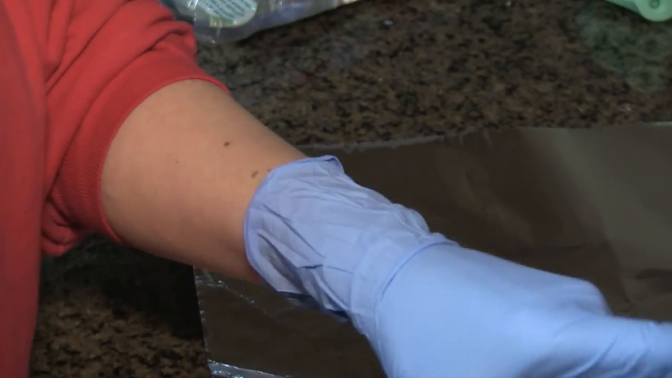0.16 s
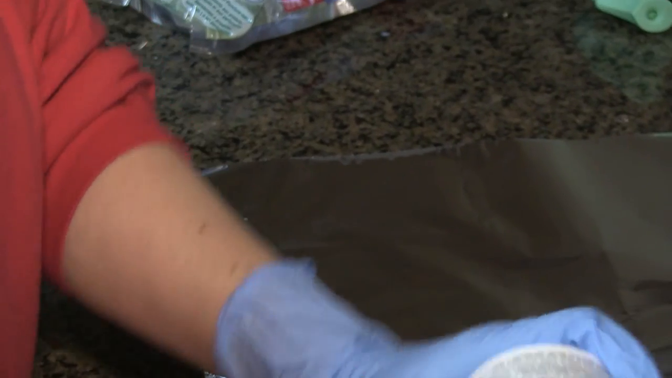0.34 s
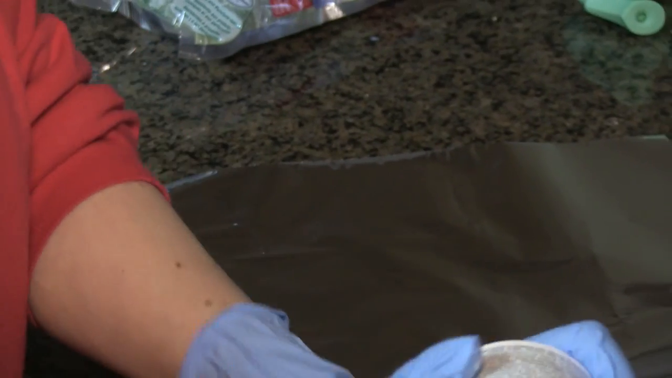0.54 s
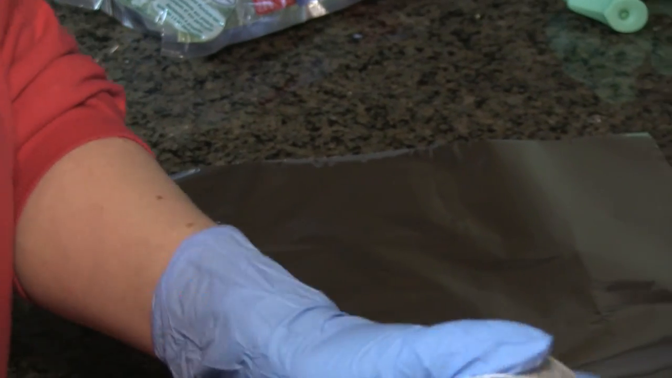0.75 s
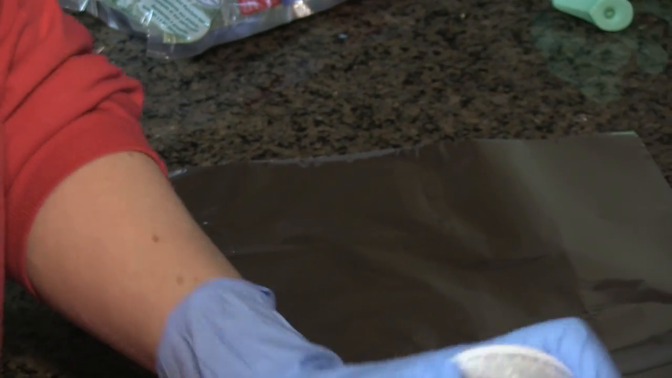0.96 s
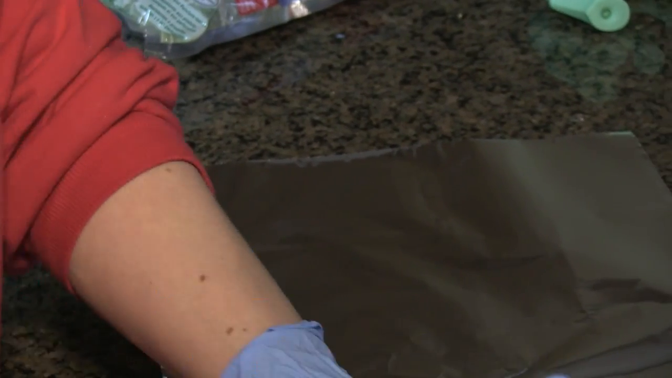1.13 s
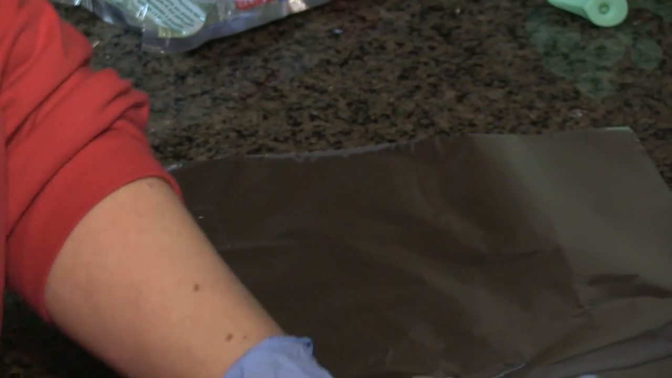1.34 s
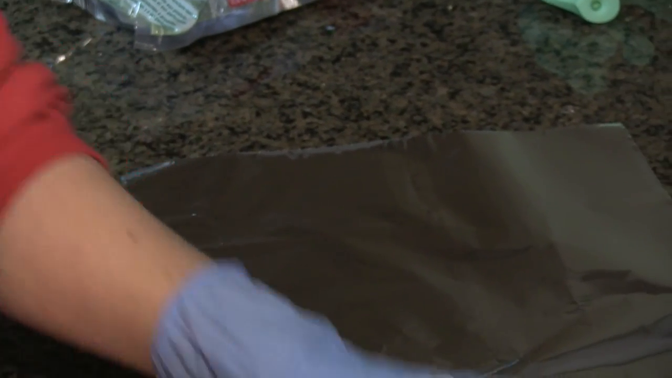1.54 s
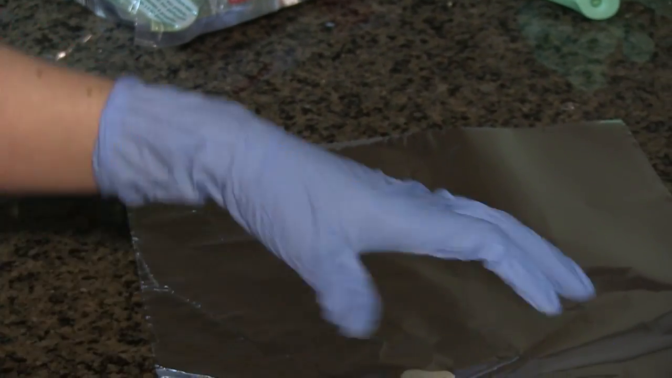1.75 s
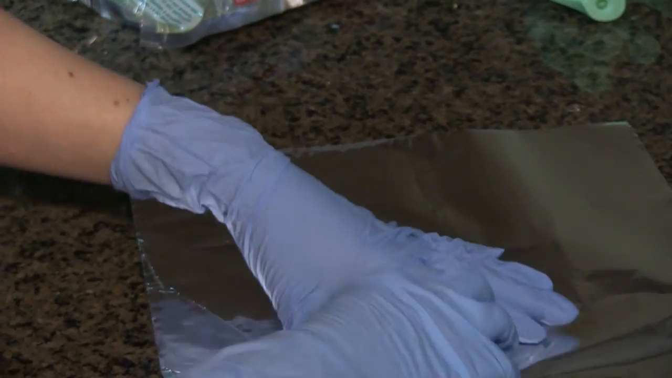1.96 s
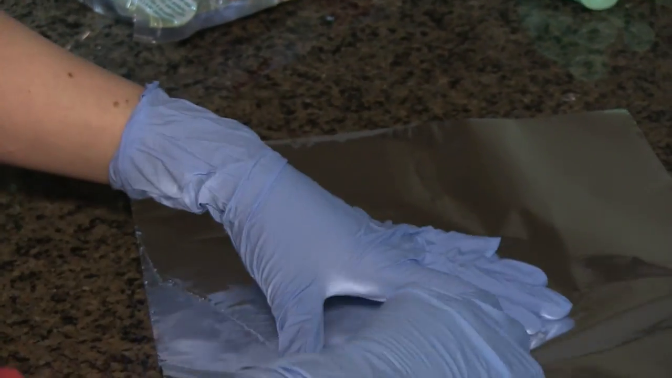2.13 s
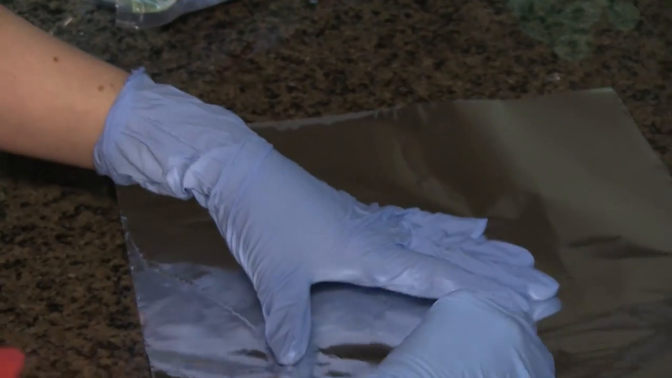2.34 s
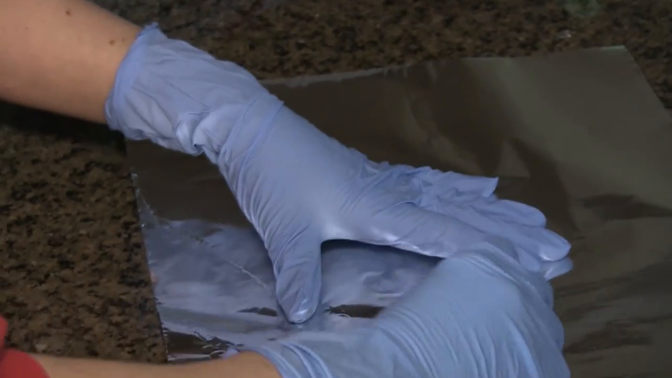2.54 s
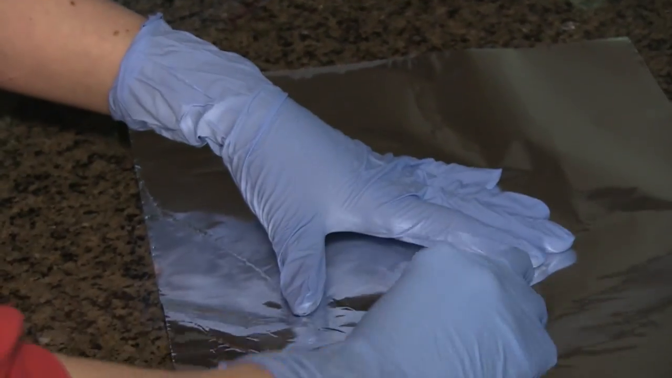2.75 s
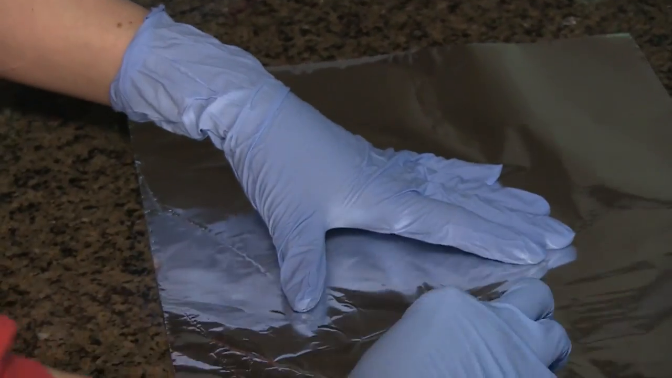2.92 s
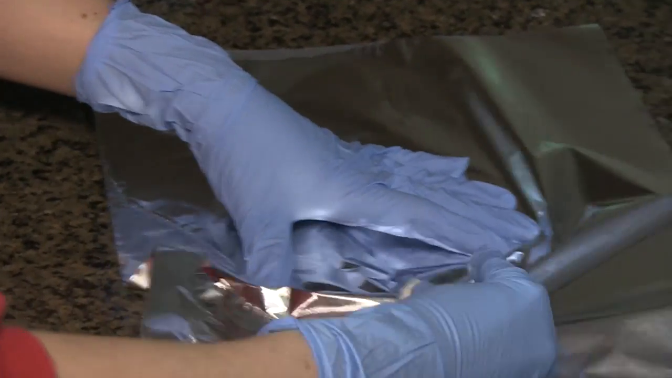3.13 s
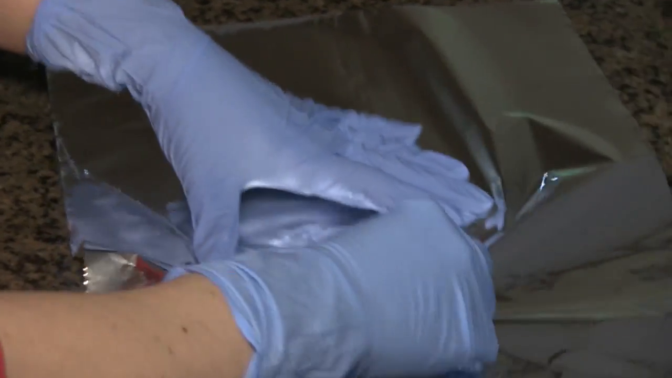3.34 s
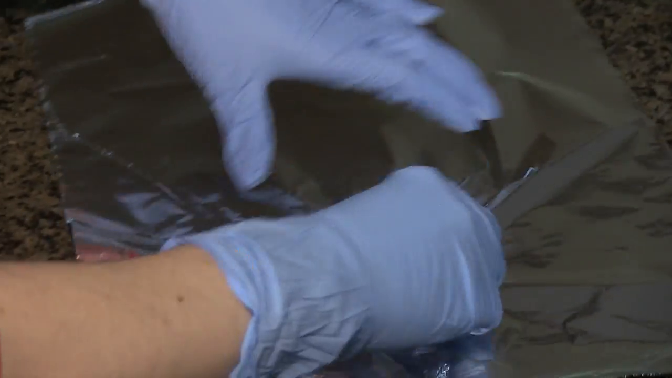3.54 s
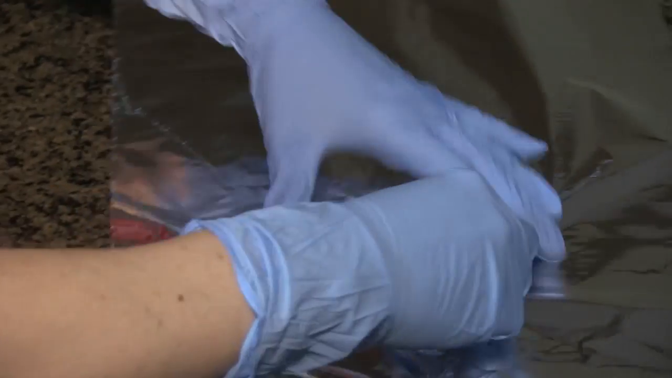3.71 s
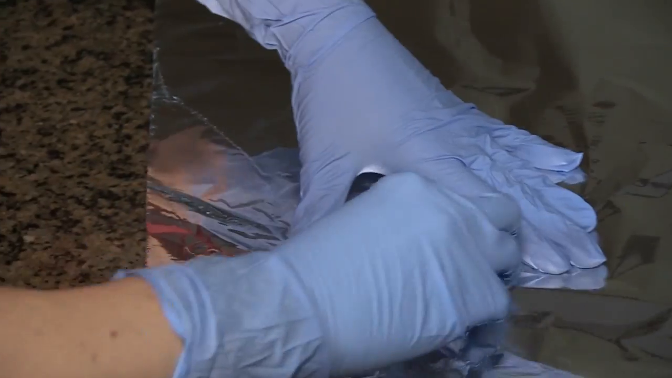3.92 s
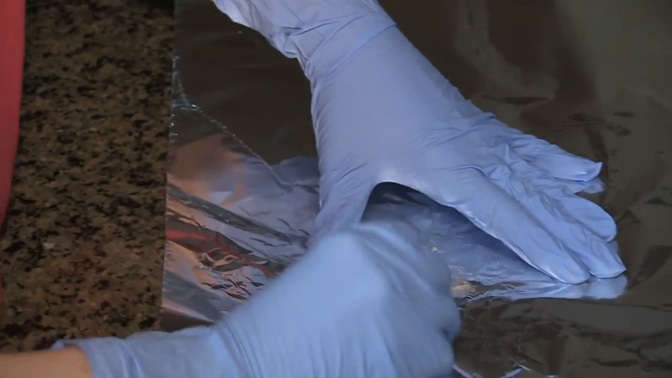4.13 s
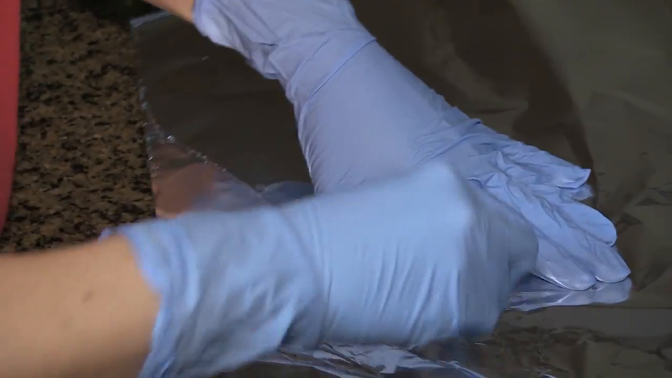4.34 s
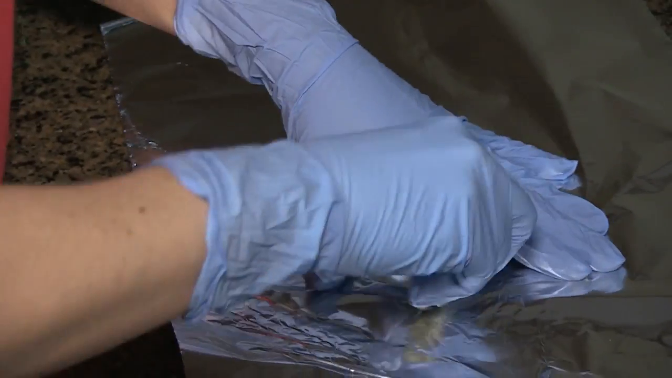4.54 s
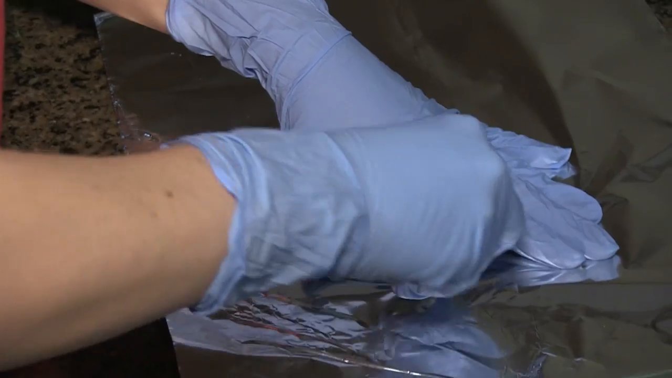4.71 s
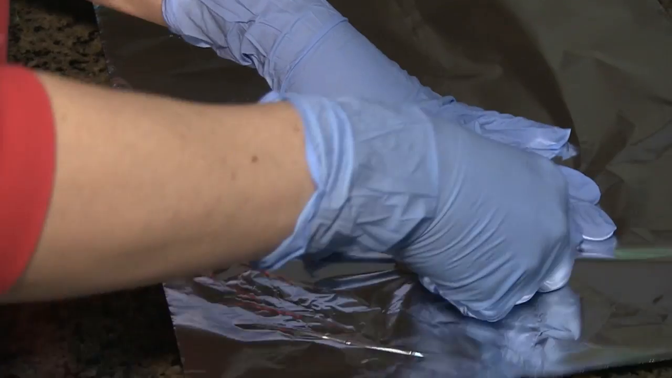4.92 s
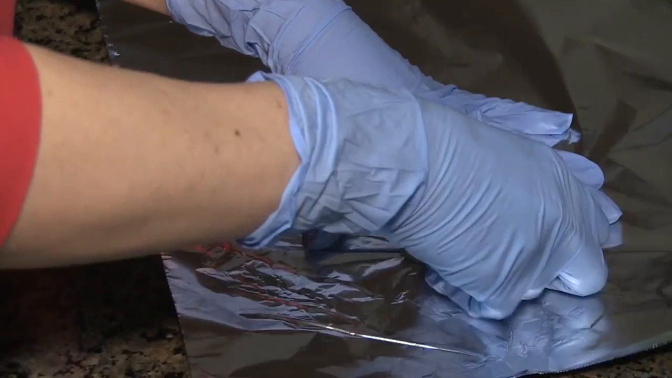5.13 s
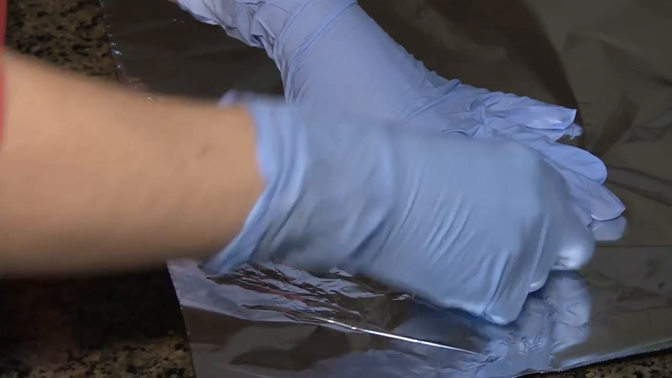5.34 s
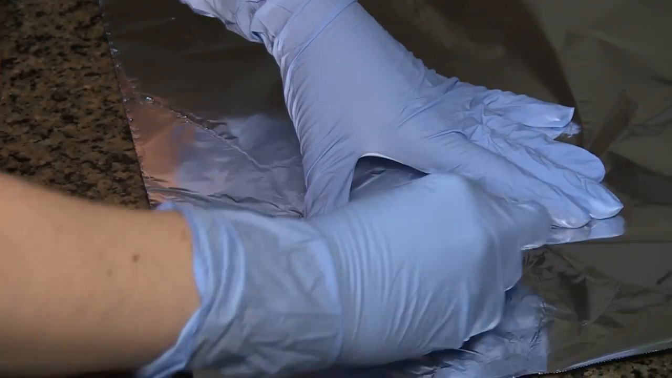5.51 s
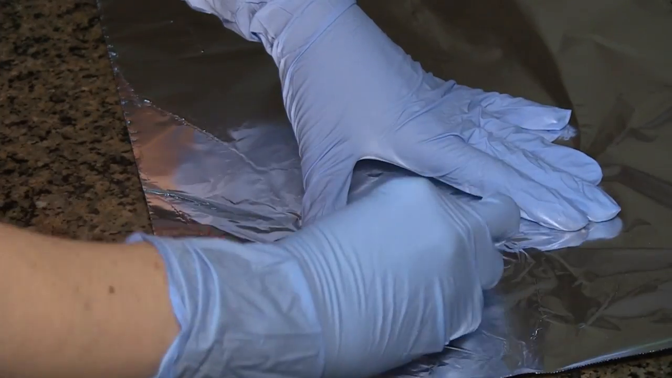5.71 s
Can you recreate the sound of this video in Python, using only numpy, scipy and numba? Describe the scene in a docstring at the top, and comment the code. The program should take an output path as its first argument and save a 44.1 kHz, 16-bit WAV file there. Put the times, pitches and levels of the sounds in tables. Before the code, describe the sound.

A close microphone first catches soft cup scuffs and a few light ticks over faint low kitchen hum. A boomy knock rattles on the counter, then bright, jerky glove strokes begin. A hard tap distorts briefly; afterwards the thin sheet keeps crinkling and snapping under bursts of rubbing, with short hard-walled echoes, thinning out at the end.

```python
"""Gloved hands swish close to the microphone over a thin sheet, in a kitchen: friction noise gated by a random grip.
The sheet buckles in thousands of tiny decaying sine grains, and single creases snap in clusters of three.
Taps ring the damped modes of a small cup; a hollow thing bounces on the counter and the cabinet booms.
Band-by-band noise tails give the echoes of hard walls, and steady low-heavy noise is the kitchen hum behind.
The hardest tap overloads the recorder."""
import sys
import numpy as np
from scipy import signal
from scipy.fft import rfft, irfft, next_fast_len
from scipy.io import wavfile
from scipy.ndimage import uniform_filter1d
from numba import njit

SR = 44100
rng = np.random.default_rng(int(sys.argv[2]) if len(sys.argv) > 2 else 0)


def put_to_file(sound):
    """Save the sound as 16-bit audio at rate SR, in the file named by the first command-line argument."""
    columns = np.atleast_2d(sound).T  # one column per channel
    safe = np.clip(columns, -1, 1)
    whole_steps = np.round(safe * 32767)
    wavfile.write(sys.argv[1], SR, whole_steps.astype(np.int16))


N = 258867  # length in samples

# Strokes of the glove over skin, cup and sheet.
# Each row: start in seconds, hiss level in dB rms, swell in seconds, hold in seconds.
STROKES = [(.34, -57.5, 0.067, 0.018), (.96, -65.5, 0.066, 0.065), (1.29, -60, 0.046, 0.012),
           (1.47, -63, 0.037, .03), (2.068, -55.5, 0.0089, 0.019), (2.13, -47.5, 0.0089, 0.012),
           (2.208, -41, 0.0066, 0.025), (2.272, -34, 0.0072, 0.026), (2.345, -35, 0.0041, 0.012),
           (2.477, -58, .004, 0.012), (2.503, -39, 0.0045, 0.014), (2.57, -38, 0.044, 0.027),
           (2.735, -39.5, 0.018, 0.0097), (2.875, -46.5, 0.014, 0.0086), (2.94, -44.5, 0.0067, 0.0089),
           (3.082, -35, 0.011, .06), (3.2, -41, 0.026, 0.14), (3.468, -31.5, 0.013, 0.021),
           (3.632, -40.5, .012, 0.03), (3.73, -45.5, 0.013, 0.021), (3.805, -30.5, 0.02, 0.009),
           (3.89, -42.5, 0.014, 0.028), (4.003, -41.5, 0.023, 0.024), (4.075, -36, .02, 0.031),
           (4.52, -42, 0.013, 0.0037), (4.652, -43.5, .005, 0.016), (4.672, -43, 0.0064, 0.022),
           (4.838, -42.5, .006, 0.073), (4.938, -37, .005, 0.027), (5.005, -38.5, 0.0082, 0.047),
           (5.11, -38, 0.0066, 0.011), (5.18, -39, 0.017, 0.03), (5.28, -38, 0.0058, 0.023),
           (5.372, -46, .008, .02), (5.425, -40.5, 0.01, 0.02), (5.55, -38, 0.0059, 0.0058),
           (5.59, -41.5, 0.016, 0.01), (5.63, -41, 0.0099, 0.018)]
STROKE_T60_S, STROKE_FLEX_DB = 0.19, -15  # fade after the hold; flexing of the sheet relative to the hiss
# The palm drags on between strokes. Each row: time in seconds, hiss in dB rms, sheet flexing in dB rms.
DRAG = [(2.05, -90, -63), (2.3, -51, -49), (2.7, -59.5, -70), (2.8, -53, -62), (3.05, -61.5, -68),
        (3.14, -43.5, -40.5), (3.27, -38.5, -40), (3.45, -46, -45.5), (3.6, -45, -54.5), (3.8, -49, -59.5),
        (4.15, -47.5, -49), (4.3, -51.5, -58), (4.48, -49, -73), (4.62, -75, -64.5), (4.82, -65, -70),
        (4.95, -41, -51.5), (5.1, -43, -38.5), (5.28, -45, -48), (5.38, -51, -61), (5.56, -50, -48.5),
        (5.75, -68, -60), (5.87, -70, -66)]
# Colour of the glove's hiss. Each row: frequency in Hz, relative density in dB per Hz.
HISS = [(600, -20.5), (1500, -24.5), (3000, -14.5), (4500, -4), (6600, -0.5), (9000, -3), (12000, -7),
        (16000, -18)]
TREBLE_HZ, FLICKER_DB = 8000, 2  # the hiss above this flickers on its own; dB per unit of walk()
# Colour of the flexing sheet. Each row: frequency in Hz, relative density in dB per Hz.
FLEX = [(100, -38), (250, -19.5), (500, -6), (1000, -1.5), (1600, -1.5), (2500, -3), (4000, -2),
        (8000, -19)]
# Fingers scuff the cup. Each row: start in seconds, level in dB rms, swell in seconds, hold in seconds.
SCUFFS = [(0, -53.5, 0.0033, 0.026), (.13, -60.5, 0.0092, 0.19), (.33, -52, 0.0049, 0.0046),
          (.39, -55, 0.021, .015), (.49, -50, 0.011, 0.11), (.668, -52, 0.0033, 0.017),
          (.955, -54.5, 0.012, 0.12), (1.33, -60.5, 0.008, 0.008)]
SCUFF_T60_S = 0.31
# Colour of the scuffs. Each row: frequency in Hz, relative density in dB per Hz.
SCUFF = [(200, -9.5), (500, -5.5), (800, -1.5), (1000, -1), (1300, -10), (2500, -13), (5000, -30.5)]
# Single creases snapping. Each row: start in seconds, level of each grain in dB, central pitch in Hz.
CREASES = [(.5506, -43.5, 3280), (1.3428, -37.5, 7500), (1.8203, -30.5, 6330), (1.953, -44.5, 3420),
           (1.967, -43, 8400), (2.1421, -24.5, 6860), (2.1814, -35, 7330), (3.007, -34, 7000),
           (3.1242, -15, 8450), (3.4285, -25.5, 3620), (3.517, -35, 6650), (3.6764, -34, 6730),
           (3.9155, -29, 6400), (4.081, -30, 5640), (4.096, -17, 7620), (4.5244, -47, 7150),
           (4.7228, -21, 9200), (4.8337, -24.5, 7600), (4.869, -31, 6140), (4.9754, -39, 6100),
           (5.009, -25, 2750), (5.016, -15.5, 8900), (5.035, -24, 4960), (5.1126, -26, 8540),
           (5.136, -27, 6230), (5.1864, -26, 3020), (5.536, -30, 4900), (5.5593, -22.5, 4380),
           (5.7555, -39, 7000), (5.82, -36, 9900)]
# Taps on cup and counter. Each row: start in seconds, peak of the ring in dB, centre of the blow in Hz,
# softness in dB per octave, share of the free ring time (limited to 0.1 to 2 in use).
TAPS = [(.082, -40, 1220, -5, 0.96), (0.0885, -14, 1340, 7, 0.91), (.128, -38, 960, 25, 0.69),
        (.335, -39.5, 930, 17, 0.65), (.499, -31.5, 740, 31, 0.43), (.552, -41, 910, 6, 0.34),
        (.597, -33.5, 840, 29, 0.61), (.672, -30, 675, 5.5, 0.64), (0.969, -47, 600, 20, 0.6),
        (1.027, -43, 830, 8, 1.3), (1.538, -54.5, 208, 41, 0.82), (1.934, -37.5, 990, 29, 0.79),
        (1.955, -38, 300, 4.5, .94), (2.071, -44, 1060, 41, 3.1), (2.185, -32.5, 970, 3, 0.76),
        (2.213, -21.5, 960, 7, 0.81), (2.459, -19.5, 1350, 1.5, .87), (2.561, -23, 1350, 0, 1.1),
        (2.7636, 3, 1015, 8.5, 0.41), (2.954, -47.5, 260, 13, .71), (2.987, -36.5, 260, 3, 0.84),
        (3.204, -35.5, 500, 17, 0.67), (3.301, -36, 650, 39, 0.37), (3.421, -26, 1730, 6.5, 0.78),
        (4.096, -43.5, 343, 22, 0.78), (4.523, -34, 2000, 7, .2), (4.733, -39, 340, 17, 1.25),
        (4.775, -46, 340, 29, 2), (4.735, -46.5, 110, 9, 1.2), (5.099, -30, 960, 11, 0.61),
        (5.469, -44, 604, 39, 0.43), (5.558, -26, 1770, 33, 0.41)]
# Modes of the cup. Each row: frequency in Hz, relative level in dB, free ring time (t60) in seconds.
CUP = [(109.7, -11.5, 0.42), (213, -24, 0.13), (267.2, -3, 0.2), (340.6, 0.5, 0.094), (495, -6.5, 0.088),
       (672, -9.5, 0.085), (765, -10, 0.093), (887, -7, 0.082), (978, 4, 0.047), (1108, -8.5, 0.15),
       (1227, -2.5, 0.087), (1370, 13, 0.016), (1640, 2.5, 0.026), (1993, 5.5, 0.021), (2262, 4.5, 0.044),
       (2725, -7.5, 0.051), (3280, -8, 0.078), (4520, -5, 0.036)]
CRACK_DB, CRACK_GROWTH = -9.5, 1.205  # first contact of a full-scale tap; dB of crack per dB of ring
CRACK_HZ, CRACK_DULLING = 9000, .35  # top of a full-scale crack; weaker taps are duller, dB of pitch per dB
# A hollow thing lands on the counter and bounces. Each row: start in seconds, peak of the boom in dB.
THUDS = [(1.7295, -11.5), (1.7345, -14.5), (1.7424, -19.5), (1.7475, -20), (1.775, -37)]
# Modes of the cabinet. Each row: frequency in Hz, relative level in dB, free ring time (t60) in seconds.
CABINET = [(155.7, -13, 0.42), (223.5, -10.5, 0.34), (296, -6, 0.21), (384, -16.5, 0.44), (447, -2, 0.29),
           (528, -2, 0.24), (584.5, 0.5, 0.25), (663, -1.5, 0.4), (738, -13, 0.21), (880, -0.5, 0.18),
           (894, 3, 0.16), (1001, -11.5, 0.42), (1184, -9, 0.34)]
# Colour of the cabinet's clatter. Each row: frequency in Hz, relative density in dB per Hz.
CLATTER = [(40, -20), (110, -17), (250, -9.5), (600, -5.5), (1050, -7.5), (1400, -19.5), (1800, -16),
           (2200, -25.5), (3500, -36.5), (9000, -57.5)]
# Echoes of the room. Each row: band centre in Hz, decay time (t60) in seconds.
ROOM_T60 = [(200, 0.4), (800, 0.36), (3000, 0.15), (10000, 0.65)]
ROOM_DB = -17  # gain of the echoes
# Colour of the kitchen hum. Each row: frequency in Hz, relative density in dB per Hz.
KITCHEN = [(26, -47), (45, -10), (53, -2.5), (123, -0.5), (284, 0.5), (391, -3), (1210, -7.5), (1510, -11),
           (8450, -22), (14500, -35), (16000, -40)]
KITCHEN_DB = -60.5  # mean level, rms
TOP_HZ = 16000  # the converter passes nothing much above this


def rustle():
    """Gloves at work: hiss and sheet flexing share one catching grip; fingers scuff the cup."""
    slide, bend = curve(DRAG)
    strokes = gestures(STROKES, STROKE_T60_S)
    grip = stutter(count=450, t60=0.13, depth=1.07) * stutter(count=500, t60=0.022, depth=2.24)
    hiss_gain = np.sqrt(strokes + slide ** 2)
    flex_gain = np.sqrt(strokes * undb(STROKE_FLEX_DB) ** 2 + bend ** 2)
    scuff_gain = np.sqrt(gestures(SCUFFS, SCUFF_T60_S))
    return glove_hiss(grip) * hiss_gain + sheet_flex(grip) * flex_gain + cup_scuff() * scuff_gain


def glove_hiss(grip):
    """Smooth friction noise plus fine buckles, its treble flickering; rms 1."""
    hiss = coloured(HISS) + undb(-6.5) * crinkle(HISS, count=30000, cycles=5.8, scatter_db=2.5)
    treble = highpass(hiss, TREBLE_HZ)
    hiss = hiss + treble * (undb(FLICKER_DB * walk(40.)) - 1)
    return unit(hiss * grip)


def sheet_flex(grip):
    """The bending sheet: lower noise and buckles whose level wanders; rms 1."""
    flex = coloured(FLEX) + undb(-3.5) * crinkle(FLEX, count=16000, cycles=5.1, scatter_db=2.0)
    return unit(flex * grip * undb(1.5 * walk(45)))


def cup_scuff():
    """Fingers rubbing the cup: noise with an unsteady level; rms 1."""
    return unit(coloured(SCUFF) * undb(4.7 * walk(58.94)))


def creases():
    """A crease flips: a cluster of three short grains around its pitch."""
    start_s, level_db, hz = np.transpose(CREASES)
    late, detune = rng.random((len(start_s), 2, 3)).transpose(1, 0, 2)
    start = ((start_s[:, None] + 0.00086 * late) * SR).astype(np.int64).ravel()
    pitch = hz[:, None] * 2 ** (detune - .5)  # up to half an octave either way
    pitch = np.minimum(pitch, .4 * SR).ravel()
    return grains(N, start, pitch, np.full(len(start), 6.), np.repeat(undb(level_db), 3))


def taps():
    """Each blow mostly drives the modes near its centre; a soft blow pushes longer and picks out only those."""
    out = np.zeros(N)
    mode_hz = np.array(CUP)[:, :1]
    for start_s, peak_db, hz, soft_db, share in TAPS:
        near_db = -soft_db * np.abs(np.log2(mode_hz / hz))
        push_s = 0.027 * max(soft_db, 1) / hz
        add(out, start_s, undb(peak_db) * ring(CUP, near_db, np.clip(share, .1, 2), push_s))
        crack_hz = max(CRACK_HZ * undb(CRACK_DULLING * peak_db), 2500)
        crack_db = CRACK_DB + CRACK_GROWTH * peak_db
        add(out, start_s, undb(crack_db) * crack(0.024, crack_hz))
    return out


def thuds():
    """At each bounce the cabinet booms in a few clear modes and an uneven clatter of countless others."""
    out, age = np.zeros(N), np.arange(SR // 2) / SR
    for start_s, peak_db in THUDS:
        add(out, start_s, undb(peak_db) * ring(CABINET, 0, share=0.89, push_s=0.000285))
        clatter = (coloured(CLATTER) * undb(1.9 * walk(88)))[:len(age)]
        add(out, start_s, undb(peak_db - 12.5 - 60 * age / 0.38) * clatter)
        add(out, start_s, undb(peak_db - 15.5) * crack(0.0074, hz=4300))
    return out


def ring(modes, gains_db, share, push_s):
    """Damped sines that start together, build up over the push and die at their own rates; peak 1."""
    hz, db, t60 = np.transpose(modes)[:, :, None]
    age = np.arange(SR // 2) / SR
    decay = undb(db + gains_db - 60 * age / (t60 * share))
    x = (decay * np.sin(2 * np.pi * hz * age)).sum(0)
    x = x * (1 - np.exp(-age / push_s))
    x = highpass(x, 150)  # small bodies radiate little bass
    return x / np.abs(x).max()


def crack(t60, hz):
    """The noise of first contact, from 1500 Hz up to a dulling limit hz; peak 1."""
    age = np.arange(SR // 20) / SR
    band = signal.butter(2, [1500, min(hz, .45 * SR)], "band", fs=SR, output="sos")
    x = signal.sosfilt(band, rng.standard_normal(len(age))) * undb(-60 * age / t60)
    return x / np.abs(x).max()


def room(x):
    """Diffuse echoes of hard walls: noise bands that each decay at their own rate."""
    age = np.arange(SR // 2) / SR
    tail = 0
    for hz, t60 in ROOM_T60:
        band = signal.butter(1, [hz / 2, min(hz * 2, .45 * SR)], "band", fs=SR, output="sos")
        noise = unit(signal.sosfilt(band, rng.standard_normal(len(age))))
        tail = tail + noise * np.sqrt(hz) * undb(-60 * age / t60)
    tail = tail * (age > .003) / np.sqrt(np.sum(tail ** 2))  # the first 3 ms stay silent
    return signal.fftconvolve(x, tail)[:N]


def kitchen():
    """The quiet kitchen behind: low-heavy steady noise whose level drifts slowly."""
    return coloured(KITCHEN) * undb(KITCHEN_DB + 0.69 * walk(1.76))


def gestures(rows, t60):
    """Power of movements that swell, hold and fade."""
    power, age = np.zeros(N), np.arange(SR // 2) / SR
    for start_s, db, swell, hold in rows:
        rise = np.sin(np.pi / 2 * np.clip(age / max(swell, .002), 0, 1)) ** 2
        fade_db = -60 * np.maximum(age - swell - hold, 0) / t60
        add(power, start_s, (rise * undb(db + fade_db)) ** 2)
    return power


def stutter(count, t60, depth):
    """The grip catches and lets go at random: sudden rises of power that fade by 60 dB in t60."""
    when, big = rng.random((count, 2)).T
    kicks = np.bincount((when * N).astype(int), -np.log(1 - big), N)
    kept = undb(-120 / (t60 * SR))  # power kept from one sample to the next
    return np.sqrt(1 + depth * signal.lfilter([1], [1, -kept], kicks))


def crinkle(table, count, cycles, scatter_db):
    """Tiny buckles at random moments and pitches, a few far louder than the rest; rms 1."""
    when, where, big, length = rng.random((count, 4)).T
    hz = table[0][0] * (table[-1][0] / table[0][0]) ** where
    # pitches crowd evenly per octave, so 10 log10(hz) restores the level per Hz
    size = undb(table_db(table, hz) + 10 * np.log10(hz) - scatter_db * np.log(1.0005 - big))
    return unit(grains(N, (when * N).astype(np.int64), hz, cycles * (.5 + length), size))


@njit
def grains(n, start, hz, cycles, size):
    """Each grain is a sine that swells briefly and dies by 50 dB within its count of cycles."""
    out = np.zeros(n)
    for g in range(len(start)):
        steps = int(cycles[g] * SR / hz[g]) + 2
        turn = np.exp(2j * np.pi * hz[g] / SR - 5.76 / steps)  # one sample of rotation and decay
        settle = np.exp(-12 / steps)
        z, unrisen = 2 * size[g] + 0j, 1.
        for i in range(start[g], min(n, start[g] + steps)):
            z, unrisen = z * turn, unrisen * settle
            out[i] += z.imag * (1 - unrisen)
    return out


def coloured(table):
    """Steady noise of the given spectrum; rms 1."""
    size = next_fast_len(N)
    hz = np.arange(size // 2 + 1) * SR / size
    spectrum = rfft(rng.standard_normal(size)) * undb(table_db(table, hz))
    return unit(irfft(spectrum, size)[:N])


def table_db(table, hz):
    """A spectrum of (Hz, dB) rows read on a log-frequency axis."""
    f, db = np.transpose(table)
    return np.interp(np.log(np.maximum(hz, 1)), np.log(f), db)


def walk(rate):
    """Random levels held 1 / rate seconds and slewed; spread somewhat under 1."""
    k = max(int(SR / rate), 1)
    return uniform_filter1d(np.repeat(rng.standard_normal(N // k + 1), k), k)[:N]


def curve(rows):
    """Gains of the dB columns at every sample; -120 dB outside the rows."""
    s, *columns = np.transpose(rows)
    return [undb(np.interp(np.arange(N) / SR, s, c, -120, -120)) for c in columns]


def highpass(x, hz):
    """Second-order low cut."""
    return signal.sosfilt(signal.butter(2, hz, "high", fs=SR, output="sos"), x)


def undb(db):
    """Amplitude of a level in dB."""
    return 10 ** (np.asarray(db) / 20)


def unit(x):
    """Scale to rms 1."""
    return x / np.sqrt(np.mean(x ** 2))


def add(out, s, sound):
    """Mix a sound in from time s."""
    i = int(s * SR)
    out[i:i + len(sound)] += sound[:N - i]


def scene():
    """Gloves, sheet, cup and cabinet up close with their echoes, over the hum of the kitchen."""
    near = rustle() + creases() + taps() + thuds()
    return (near + undb(ROOM_DB) * room(near) + kitchen())[None]


def record(dry):
    """The microphone drops deep bass; the converter adds an offset, clips near full scale and cuts the top."""
    x = highpass(dry, 55) + 0.00059
    clipped = np.clip(x, -.96, .96)
    return signal.sosfilt(signal.ellip(10, .2, 80, TOP_HZ, fs=SR, output="sos"), clipped)


dry = scene()
out = record(dry)
put_to_file(out)
```